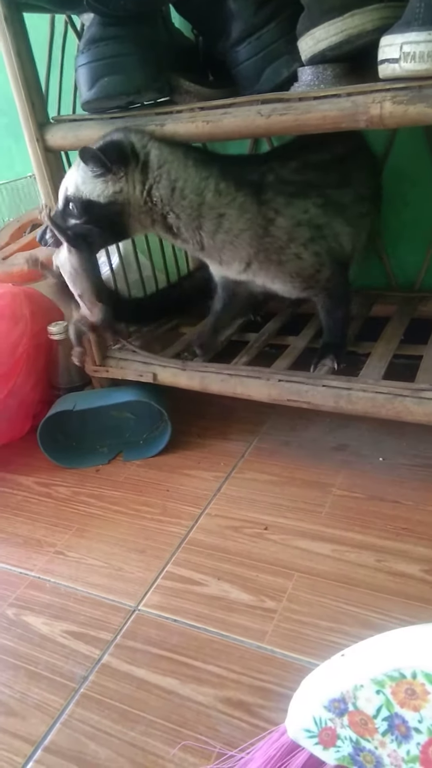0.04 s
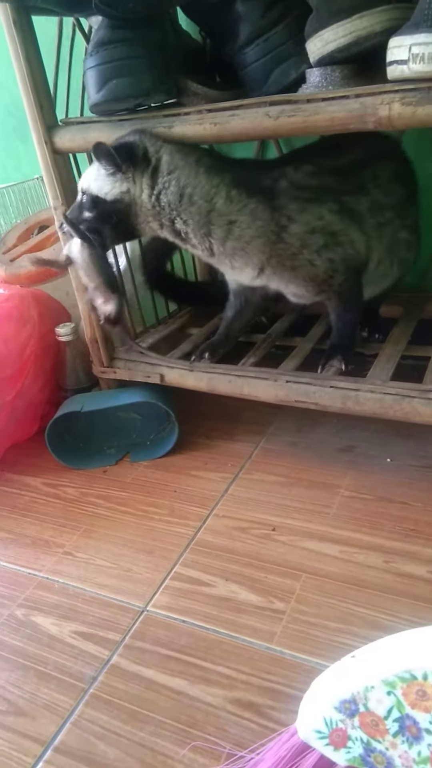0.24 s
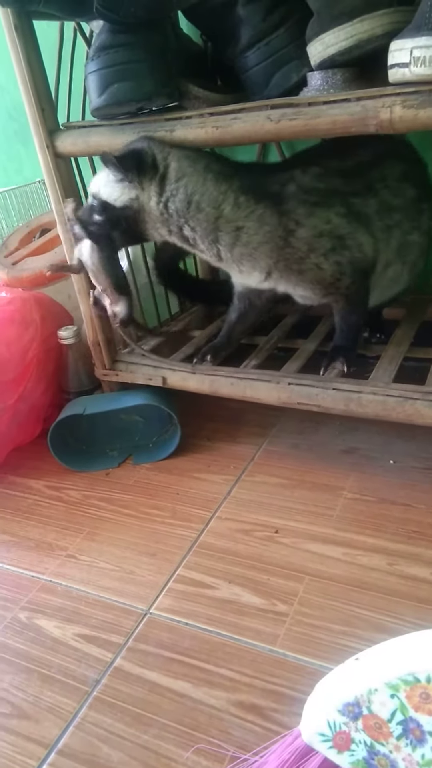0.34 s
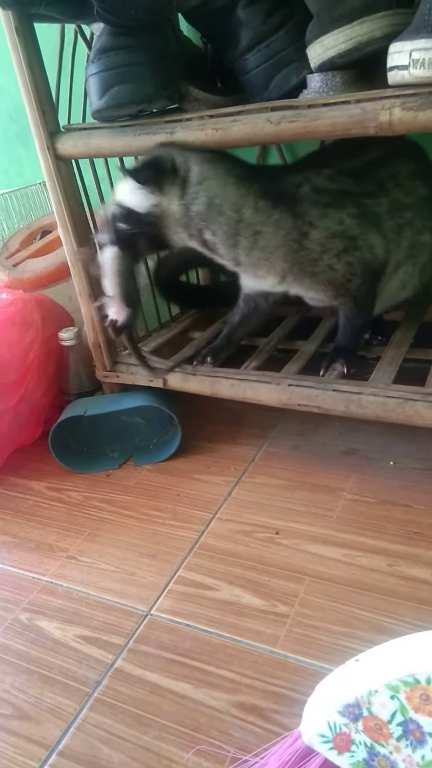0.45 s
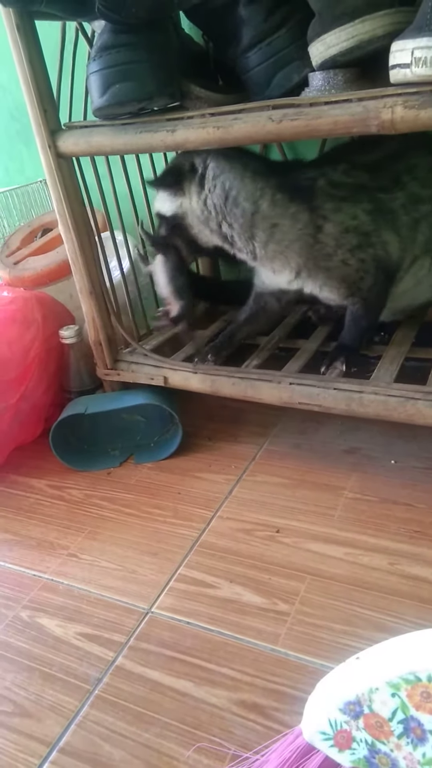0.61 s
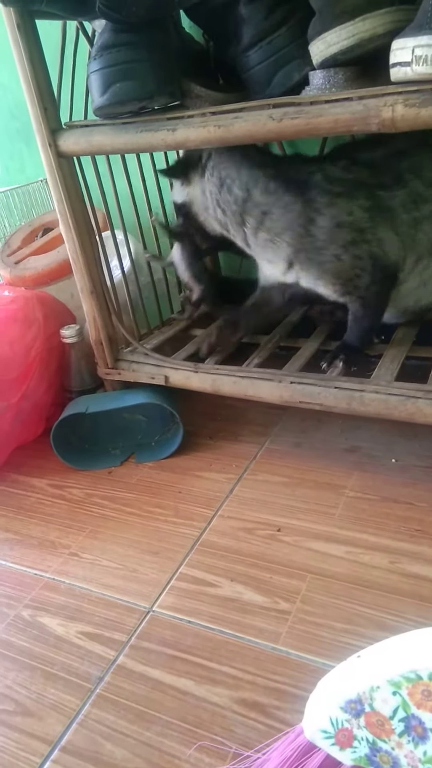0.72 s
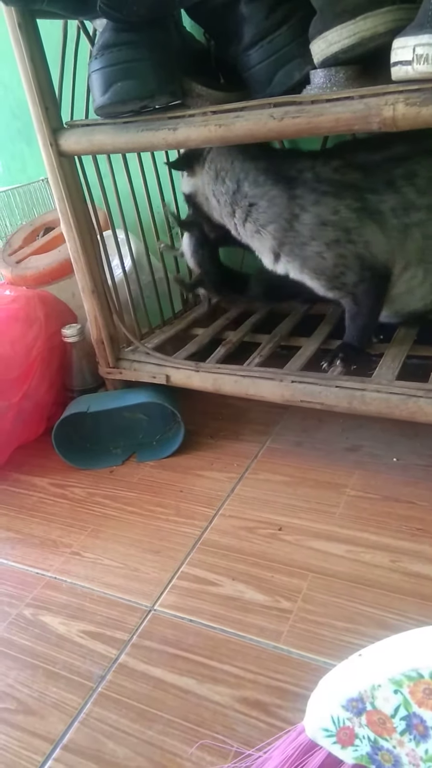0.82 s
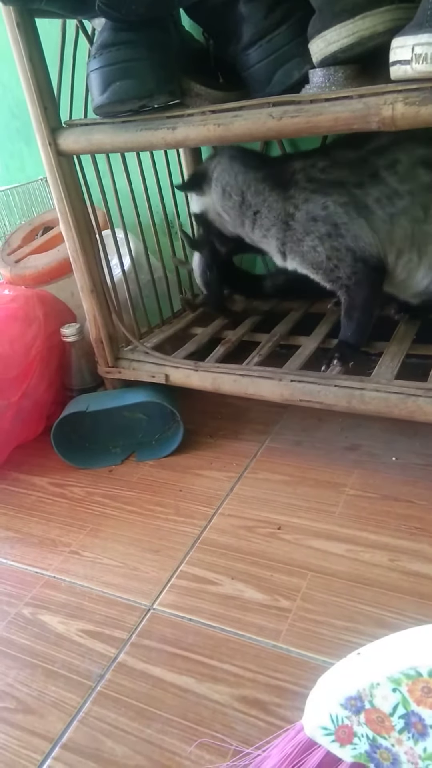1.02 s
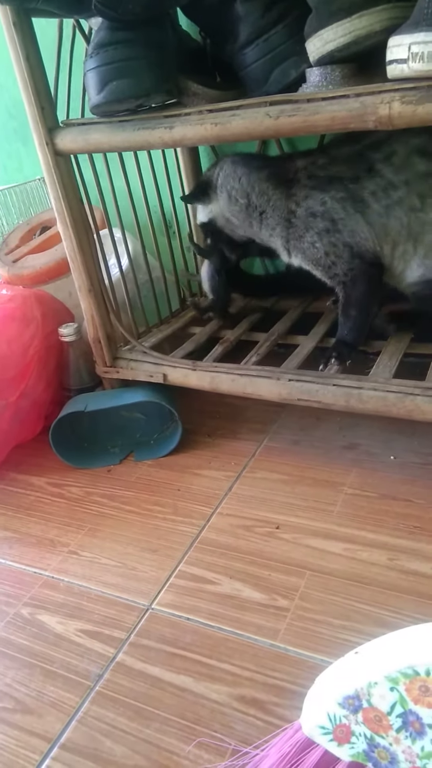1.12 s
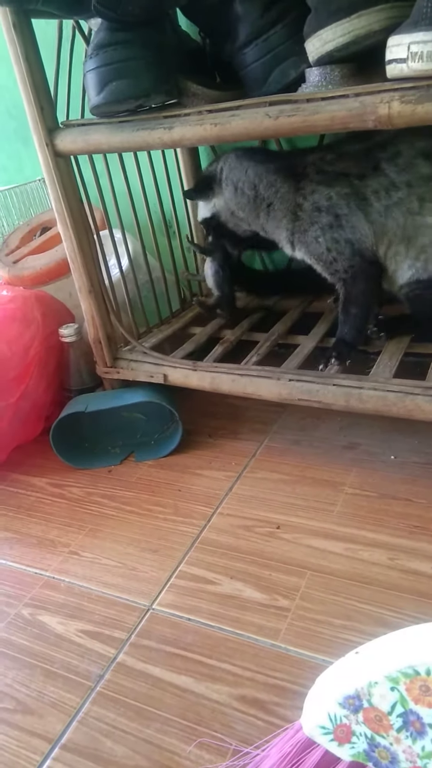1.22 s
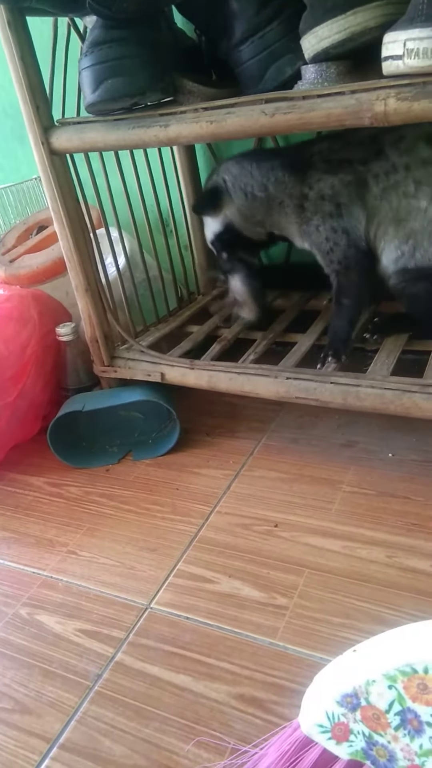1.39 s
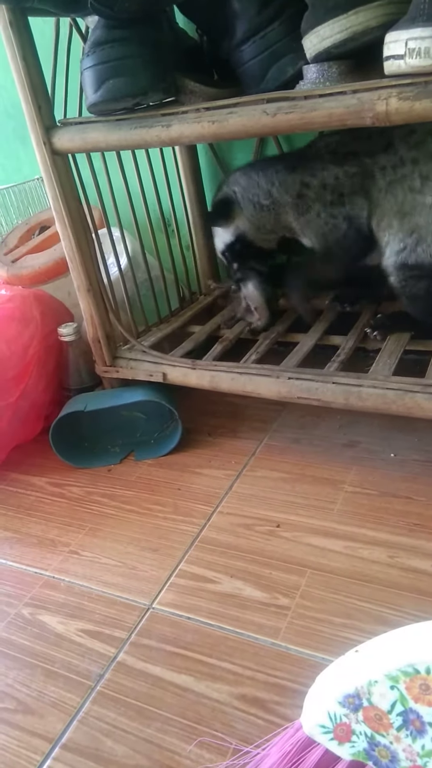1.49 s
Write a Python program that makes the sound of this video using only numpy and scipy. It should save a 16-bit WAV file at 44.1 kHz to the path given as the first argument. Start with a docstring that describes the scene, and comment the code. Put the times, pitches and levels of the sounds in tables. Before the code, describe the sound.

A civet gives one cat-like wail close by in a tiled room. Soft brushing and claw ticks on wooden slats come first, around 0.2 seconds. The cry starts at 0.3 as a creak, rises as a thin mew, cracks twice near 0.8 into a louder rasping scream, and flicks upward, ending at 1.2. Brushing returns near 1.45. Faint wooden bumps and low room rumble lie underneath.

```python
"""Civet on a shoe rack

In a quietly rumbling tiled room, a civet carries a small animal along a wooden rack near the microphone.
Claws tick on the slats, something brushes along the rack, and the frame bumps under the shifting weight.
One long wail rings off the tiles: it starts as a creak and a thin rising mew, breaks in pitch twice
as the mouth opens into a rasping scream, and ends in an upward flick."""
import sys
import numpy as np
from scipy import signal
from scipy.fft import rfft, irfft, next_fast_len
from scipy.io import wavfile
from scipy.ndimage import uniform_filter1d

SR = 44100
rng = np.random.default_rng(int(sys.argv[2]) if len(sys.argv) > 2 else 0)


def dump_mix(stems):
    """Bounce the given channels to the path in sys.argv[1] as a 16-bit WAV at rate SR."""
    frames = np.atleast_2d(stems).T  # one column per channel
    limited = np.clip(frames, -1, 1)  # hard clip at full scale
    pcm = np.round(limited * 32767).astype(np.int16)
    wavfile.write(sys.argv[1], SR, pcm)


N = 68355
TIME_S = np.arange(N) / SR
TOP_HZ = 15500


def amp(db):
    return 10 ** (np.asarray(db) / 20)


def unit_rms(x):
    return x / np.sqrt(np.mean(x ** 2) + 1e-20)


def along(points, hz):
    """Read (frequency_hz, value) points at hz, on a log axis."""
    freqs, values = np.transpose(points)
    return np.interp(np.log(hz + 1), np.log(freqs + 1), values)


def curve(points):
    """Join (time_s, value) points into one value per sample."""
    return np.interp(TIME_S, *np.transpose(points))


def wobble(rate_hz):
    """A smooth random curve with rate_hz knots a second."""
    smooth = signal.resample(rng.standard_normal(2048), 16384)
    return np.interp(TIME_S * rate_hz, np.linspace(0, 2048, len(smooth)), smooth)


def filtered(x, response):
    """Shape the spectrum of x by the gain response(hz)."""
    size = next_fast_len(N + SR // 2)
    return irfft(rfft(x, size) * response(np.fft.rfftfreq(size, 1 / SR)), size)[:N]


def noise(colour):
    """Noise of rms 1, coloured by (frequency_hz, gain_db) points."""
    return unit_rms(filtered(rng.standard_normal(N), lambda hz: amp(along(colour, hz))))


# Rumble and hiss of the room: frequency_hz, gain_db
RUMBLE_COLOUR = [(25, -40), (45, -13), (65, -8), (85, -0.5), (110, -4), (150, -3), (200, -3), (290, -6.5),
                 (420, -11), (520, -14.5), (900, -17.5), (1800, -19.5), (2700, -25), (4000, -13),
                 (5000, -18.5), (6500, -16), (7800, -20), (9500, -35), (12000, -42), (15000, -42)]
# Tones of the room's hum: pitch_hz, level_db
HUM_TONES = [(144, -71.5), (173, -71.5), (393, -72.5), (442, -76.5)]


def room_tone():
    """All around the microphone: low rumble, faint hiss and a wavering hum."""
    hum = np.zeros(N)
    for hz, db in HUM_TONES:
        level = amp(db + 3 * wobble(6.6))
        hum += level * np.sin(2 * np.pi * hz * TIME_S + 0.66 * wobble(9.27))
    return amp(-58.5) * noise(RUMBLE_COLOUR) + np.sqrt(2) * hum


# Ring time of the tiled room: frequency_hz, t60_s
ROOM_DECAY = [(300, 0.95), (2000, 0.29), (5000, 0.43), (12000, 0.11)]


def tiled_room(sound, early_db=-12, early_t60_s=0.081, tail_db=-11.5):
    """Quick reflections from rack and tiles reach the microphone, with the room's longer tail."""
    hz, frame_s, spectrum = signal.stft(rng.standard_normal(SR // 2), SR, nperseg=256)
    decay = np.exp(-np.log(1000) * frame_s / along(ROOM_DECAY, hz)[:, None])
    tail = signal.istft(spectrum * decay, SR, nperseg=256)[1]
    age = np.arange(len(tail)) / SR
    early = rng.standard_normal(len(tail)) * np.exp(-np.log(1000) * age / early_t60_s) * (age > 0.002)
    response = amp(tail_db) * tail / np.linalg.norm(tail) + amp(early_db) * early / np.linalg.norm(early)
    return signal.fftconvolve(sound, response)[:N]


# Soft bumps of the wooden frame: peak_s, half_length_s, centre_hz, level_db
FRAME_BUMPS = [(0.14, 0.11, 143, -60), (0.364, 0.015, 182, -58), (0.441, .025, 145, -59),
               (0.536, 0.028, 168, -63), (0.731, 0.042, 147, -62), (.91, 0.015, 154.9, -60),
               (1.213, 0.086, 207, -61), (1.455, 0.027, 86, -61)]


def frame_bumps(relative_width=0.14):
    """The rack's frame gives dull swells of narrow-band noise under the shifting weight."""
    out = np.zeros(N)
    for peak_s, half_length_s, centre_hz, db in FRAME_BUMPS:
        band = lambda hz: np.exp(-((hz / centre_hz - 1) / relative_width) ** 2)
        swell = np.exp(-((TIME_S - peak_s) / half_length_s) ** 2 / 2)
        out += amp(db) * swell * unit_rms(filtered(rng.standard_normal(N), band))
    return out


# Rubbing on the rack, before and after the cry: time_s, level_db
BRUSH_LEVEL = [(0, -59), (.06, -60), (.1, -64), (.17, -58), (.25, -60), (.32, -68), (.4, -80), (1.4, -80),
               (1.432, -68), (1.45, -55), (1.478, -51.5), (1.51, -54.5), (1.55, -55.5)]
# Hiss of the rubbing: frequency_hz, gain_db
BRUSH_SPECTRUM = [(590, -40), (1000, -17), (1210, -12), (1800, -9.5), (1950, -17), (2110, -8), (4830, -6.5),
                  (6130, 3), (7600, -4), (12400, -31.5), (15000, -26)]


def brushing():
    """Something rubs along the rack close by with a soft, slightly grainy hiss."""
    grain_db = 0.7 * wobble(300)
    return amp(curve(BRUSH_LEVEL) + grain_db) * noise(BRUSH_SPECTRUM)


# Claws landing on the slats: start_s, level_db, t60_s
CLAW_TICKS = [(0.2178, -31.5, 0.03), (0.2211, -38, 0.017), (0.2309, -34.5, 0.022), (0.2315, -38.5, 0.017),
              (0.3633, -39.5, 0.026)]
# Colour of a tapped slat: frequency_hz, gain_db
SLAT_COLOUR = [(600, -22), (1000, -33), (1400, -14.5), (2600, -18.5), (3300, -9.5), (4400, -4), (5300, -4),
               (6300, 0.5), (7400, -5), (8500, -22.5), (10000, -26), (12000, -42), (14300, -30),
               (15500, -35)]


def claws(rise_s=0.00024):
    """Each claw strikes a short, dry burst from the slats near the microphone."""
    out = np.zeros(N)
    for start_s, db, t60_s in CLAW_TICKS:
        age = np.maximum(TIME_S - start_s, 0)
        envelope = np.exp(-np.log(1000) * age / t60_s) * (1 - np.exp(-age / rise_s))
        out += amp(db) * envelope * noise(SLAT_COLOUR)
    return out


# Flares in the cry's overtones: start_s, length_s, centre_hz, gain_db
OVERTONE_FLARES = [(0.612, .016, 4360, 3), (0.651, 0.082, 5120, 15.5), (0.767, 0.052, 3095, 10),
                   (.81, 0.025, 4040, 5), (0.886, .015, 4470, -1), (0.965, .021, 5398, 19),
                   (1.098, 0.051, 3794, 6), (1.153, 0.032, 4800, 7.5), (1.19, 0.025, 6240, 4)]


def flares(edge_s=0.002):
    """Overtones near one frequency flare up in brief spells; gives centre and gain per sample."""
    start_s, length_s, centre_hz, gain_db = np.transpose(OVERTONE_FLARES)
    age = TIME_S - start_s[:, None]
    spells = (np.tanh(age / edge_s) - np.tanh((age - length_s[:, None]) / edge_s)) / 2
    return centre_hz @ spells / (spells.sum(axis=0) + 1e-9), gain_db @ spells


# Throat resonances, mouth nearly shut and wide open: frequency_hz, gain_db
THROAT_SHUT = [(300, -40), (600, -19), (950, -24), (1400, -9), (1600, -4), (1830, 0), (2150, -4),
               (2400, -8), (2800, -11), (3500, -14), (4400, -30), (5400, -24), (6500, -36), (8000, -43),
               (10000, -58), (15000, -62)]
THROAT_WIDE = [(500, -36), (1200, -22), (2050, -20), (2450, -8.5), (3100, -16), (3450, -9), (3720, -1),
               (3950, -3), (4300, 3), (4600, 5), (4900, -0.5), (5300, -10.5), (5700, 2.5), (6050, -2),
               (6500, -4), (7300, -12.5), (8500, -19.5), (9500, -34.5), (11500, -42), (13200, -38.5),
               (15500, -41)]
# Spells of period doubling: peak_s, half_length_s, gain_db
PERIOD_DOUBLING = [(.618, .012, -19), (.86, .014, -11), (.897, .02, -13), (1.022, .018, -9),
                   (1.07, .015, -16), (1.2, .022, -11)]


def overtones(pitch_hz, phase, opening, flare_width_hz=750):
    """The throat shapes the harmonics; period doubling adds lines half-way between them. Rms 1."""
    doubling = sum(amp(db) * np.exp(-((TIME_S - peak_s) / half_length_s) ** 2)
                   for peak_s, half_length_s, db in PERIOD_DOUBLING)
    flare_hz, flare_db = flares()
    tone, power = np.zeros(N), np.zeros(N)
    for multiple in np.arange(1.5, 14, 0.5):
        hz = multiple * pitch_hz
        throat_db = (1 - opening) * along(THROAT_SHUT, hz) + opening * along(THROAT_WIDE, hz)
        throat_db += flare_db * np.exp(-((hz - flare_hz) / flare_width_hz) ** 2)
        flutter_db = 1.4 * wobble(30) + 2.3 * opening * wobble(150)
        gain = amp(throat_db + flutter_db) * (doubling if multiple % 1 else 1) * (hz < TOP_HZ)
        tone += gain * np.sin(multiple * phase + rng.uniform(0, 2 * np.pi))
        power += gain ** 2 / 2
    return tone / np.sqrt(power)


def husk(phase, opening):
    """Breath noise through the same throat, pulsing once a cycle of the voice."""
    breath = (1 - opening) * noise(THROAT_SHUT) + opening * noise(THROAT_WIDE)
    return unit_rms(breath * (1 + 0.5 * np.cos(phase)))


# The cry's lowest tone: time_s, level_db
FUNDAMENTAL_LEVEL = [(.36, -82), (.4, -71), (.62, -67), (.72, -73), (.95, -73), (1.0, -68), (1.2, -67),
                     (1.226, -63), (1.24, -70), (1.26, -69), (1.29, -90)]


def fundamental(pitch_hz, jitter, peep_hz=1710):
    """A faint, clean tone under the cry that lingers as a last peep."""
    phase = 2 * np.pi * np.cumsum(np.minimum(pitch_hz, peep_hz) * (1 + jitter)) / SR
    level = amp(curve(FUNDAMENTAL_LEVEL)) * (TIME_S > FUNDAMENTAL_LEVEL[0][0])
    return level * np.sqrt(2) * np.sin(phase)


# The cry's three stretches between its pitch breaks: time_s, pitch_hz
MEW_PITCH = [(0.35, 516.3), (0.37, 575.5), (0.398, 580), (0.42, 649.5), (0.44, 696.5), (0.508, 775),
             (0.556, 894), (0.622, 964), (0.68, 887), (0.736, 973), (0.756, 961.5), (0.8, 1133),
             (0.804, 1142)]
SURGE_PITCH = [(0.81, 1032), (0.836, 1091), (0.85, 1205), (0.866, 1207), (0.879, 1269)]
SCREAM_PITCH = [(0.884, 1093), (0.904, 1119), (0.934, 1206), (0.96, 1229), (0.976, 1197), (1.002, 1241),
                (1.012, 1314), (1.032, 1302), (1.076, 1156), (1.092, 1201), (1.126, 1263), (1.15, 1211),
                (1.172, 1132), (1.19, 1003), (1.213, 1010)]
# Loudness of the cry: time_s, level_db
CRY_LEVEL = [(0.28, -55), (0.314, -58), (0.36, -52.5), (0.492, -52.5), (0.57, -42.5), (0.696, -43),
             (0.752, -51), (0.824, -34), (0.88, -42), (0.886, -34.5), (0.91, -40), (0.964, -41),
             (0.974, -32), (1.006, -46), (1.014, -42), (1.112, -40.5), (1.12, -37), (1.216, -41),
             (1.245, -53)]
# Mouth opening and roughness of the voice: time_s, amount_0_to_1
MOUTH_OPENING = [(.3, .25), (.44, .2), (.5, .16), (.57, 0), (.6, .02), (.618, .24), (.645, .12), (.67, .25),
                 (.7, .25), (.72, .27), (.76, .52), (.81, .97), (1.222, 1)]
VOICE_RASP = [(.31, .95), (.348, .75), (.38, .28), (.415, .28), (.45, .1), (.56, .04), (.605, .04),
              (.618, .2), (.635, .05), (.72, .08), (.79, .14), (.806, .45), (.815, .07), (.845, .09),
              (.857, .42), (.877, .2), (.895, .48), (.912, .48), (.94, .2), (1.0, .22), (1.025, .45),
              (1.05, .28), (1.075, .3), (1.11, .11), (1.16, .14), (1.183, .3), (1.195, .22), (1.21, .25),
              (1.221, .6)]
# Airy sheen above the overtones: frequency_hz, gain_db
SHEEN_COLOUR = [(7000, -38), (9000, 0), (11500, -7), (13400, -1), (15500, -15)]


def wail(creak_hz=125, creak_end_s=0.37, flick_s=1.212, flick_hz_per_s=23000, stop_s=1.229):
    """A close cry through an opening mouth; rasp shakes its pitch and level and adds husk."""
    opening, rasp = np.clip(curve(MOUTH_OPENING), 0, 1), np.clip(curve(VOICE_RASP), 0, 1)
    pitch_hz = curve(np.vstack([MEW_PITCH, SURGE_PITCH, SCREAM_PITCH]))
    pitch_hz += flick_hz_per_s * np.maximum(TIME_S - flick_s, 0)
    jitter = 0.00473 * wobble(290) + 0.0311 * rasp * wobble(870)
    phase = 2 * np.pi * np.cumsum(pitch_hz * (1 + jitter)) / SR
    tone = overtones(pitch_hz, phase, opening)
    shimmer_db = (0.5 + 3.5 * rasp) * wobble(330)
    voice = np.sqrt(1 - rasp ** 2) * amp(shimmer_db) * tone + amp(-4.5) * rasp * husk(phase, opening)
    voice += amp(-38) * np.minimum(opening / 0.2, 1) * noise(SHEEN_COLOUR)
    creak_depth = np.clip((creak_end_s - TIME_S) / 0.045, 0, 1)  # the cry begins in slow pulses
    voice *= 1 + creak_depth * np.sin(2 * np.pi * creak_hz * TIME_S + wobble(creak_hz / 2))
    fade_in = uniform_filter1d(1.0 * (TIME_S > CRY_LEVEL[0][0]), size=2400)
    cut_off = (1 - np.tanh((TIME_S - stop_s) / 0.0039)) / 2
    return fade_in * cut_off * amp(curve(CRY_LEVEL)) * voice + fundamental(pitch_hz, jitter)


def scene():
    """The animals on the rack in front, the tiled room and its rumble behind."""
    near = wail() + claws() + brushing()
    return (near + tiled_room(near) + frame_bumps() + room_tone())[None]


def record(dry):
    """One phone microphone, which keeps nothing above its band limit."""
    return filtered(dry[0], lambda hz: hz < TOP_HZ)[None]


dry = scene()
out = record(dry)
dump_mix(out)
```